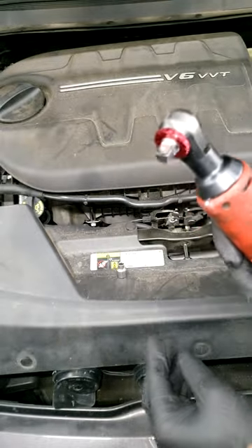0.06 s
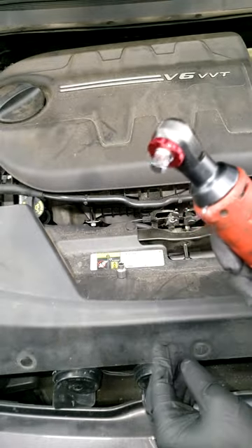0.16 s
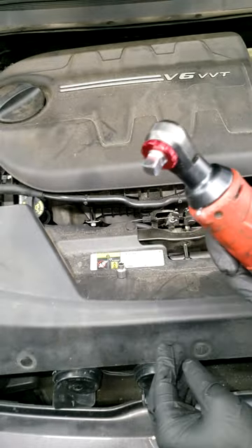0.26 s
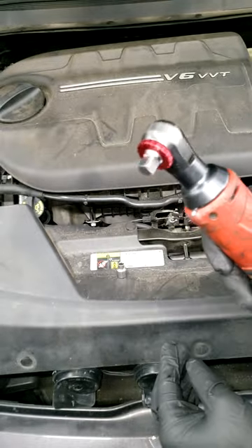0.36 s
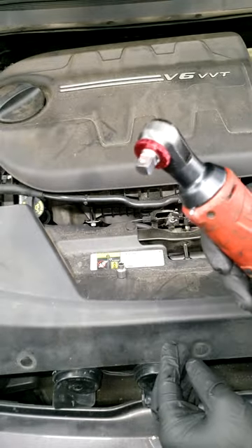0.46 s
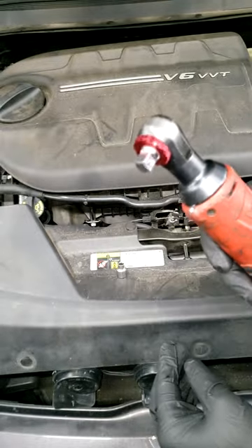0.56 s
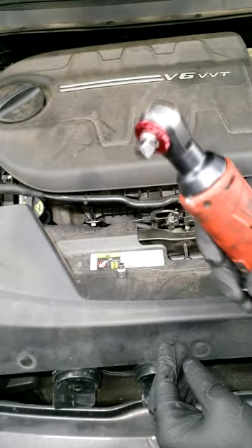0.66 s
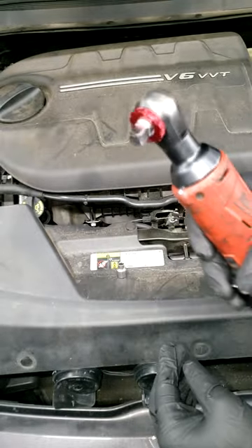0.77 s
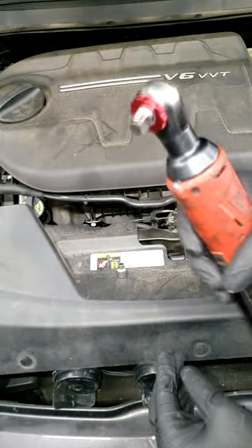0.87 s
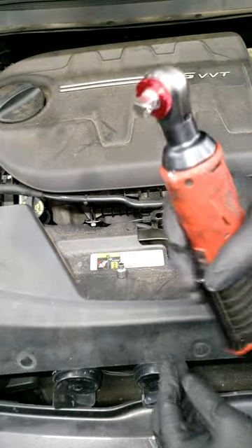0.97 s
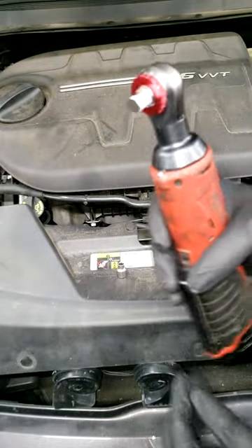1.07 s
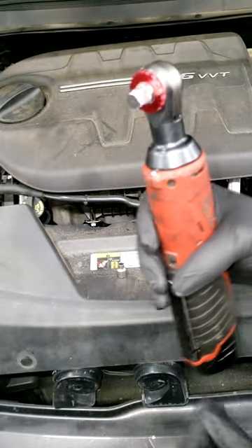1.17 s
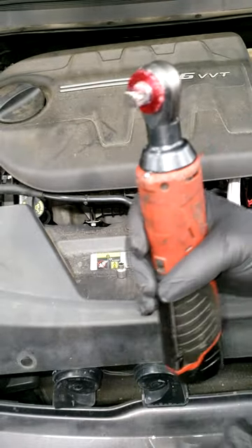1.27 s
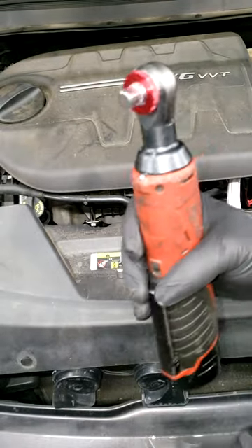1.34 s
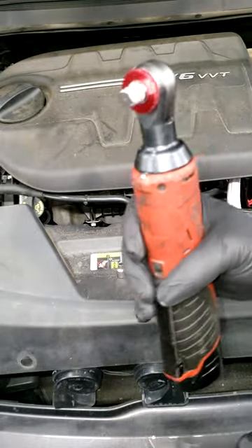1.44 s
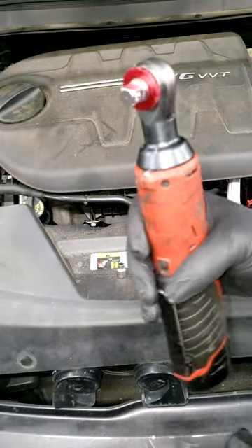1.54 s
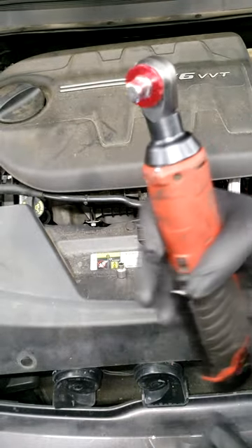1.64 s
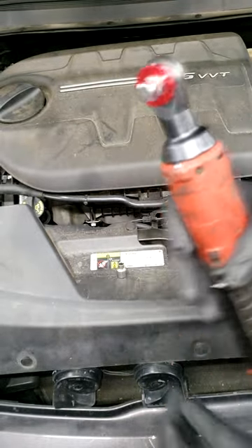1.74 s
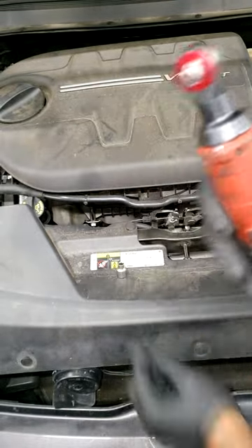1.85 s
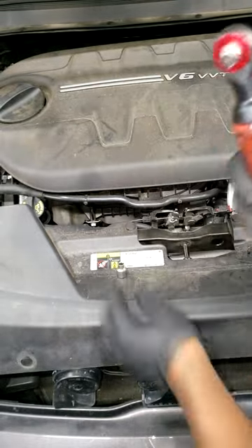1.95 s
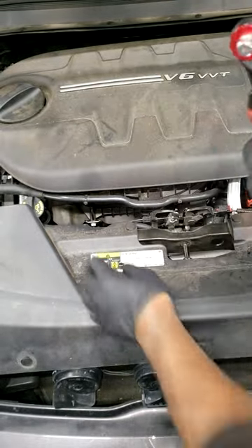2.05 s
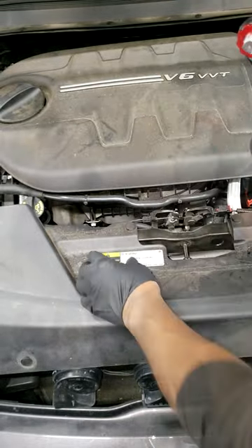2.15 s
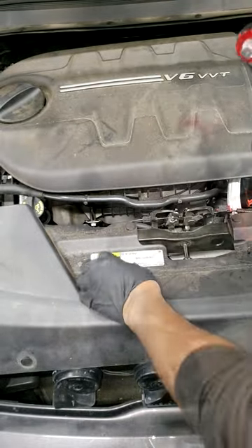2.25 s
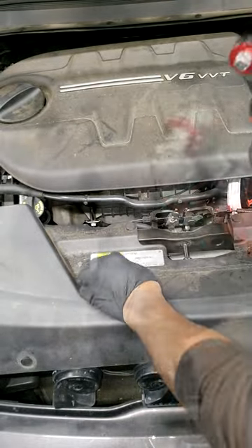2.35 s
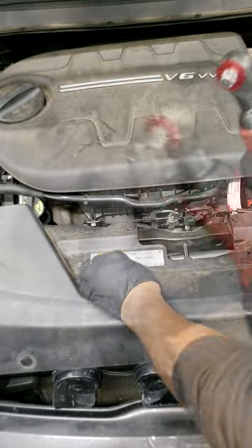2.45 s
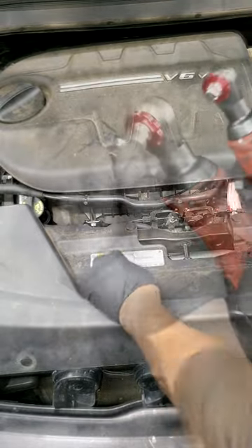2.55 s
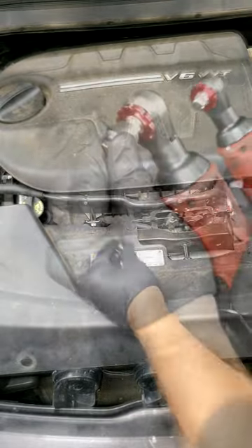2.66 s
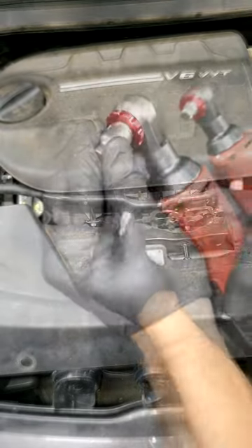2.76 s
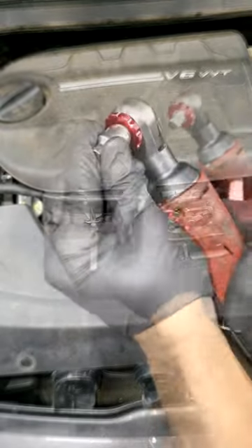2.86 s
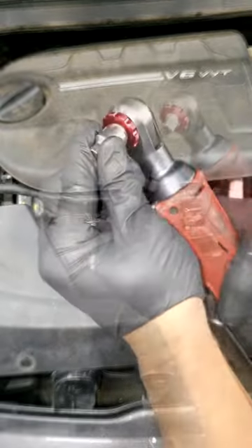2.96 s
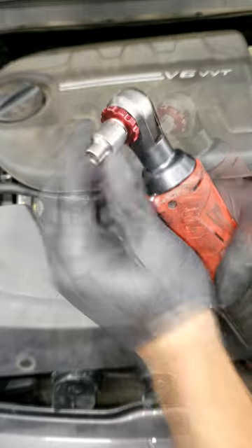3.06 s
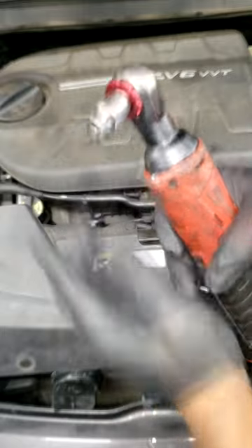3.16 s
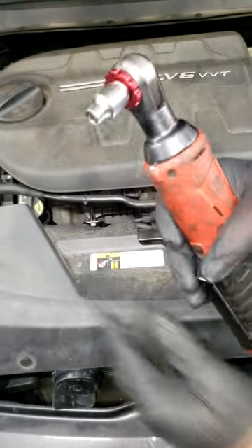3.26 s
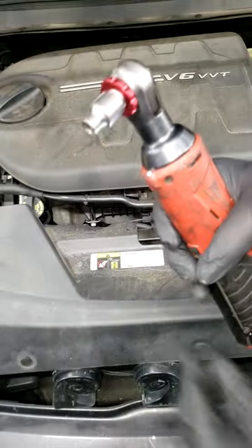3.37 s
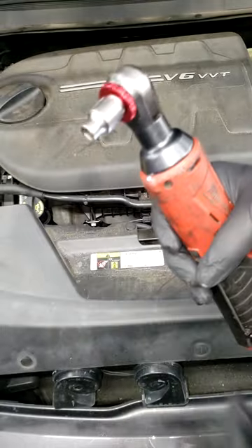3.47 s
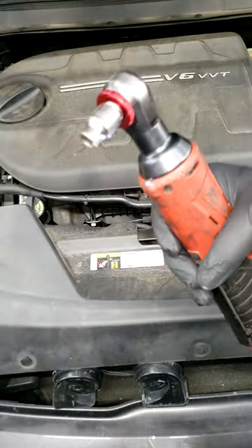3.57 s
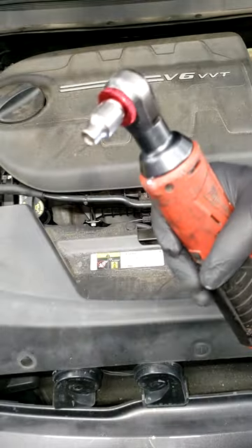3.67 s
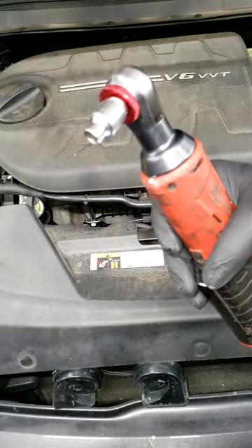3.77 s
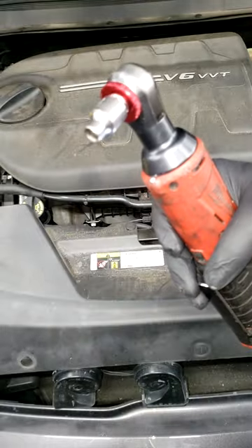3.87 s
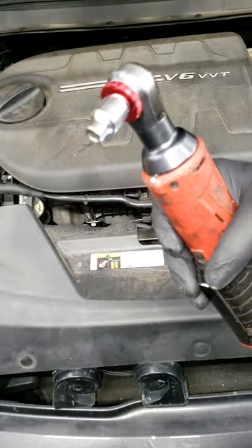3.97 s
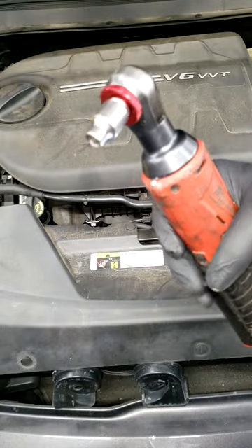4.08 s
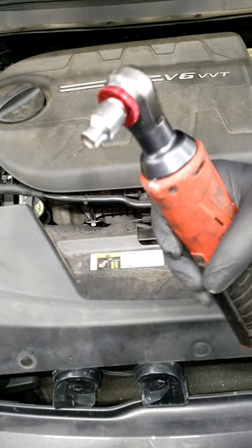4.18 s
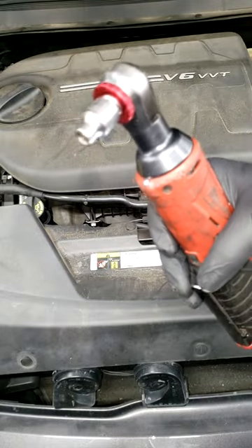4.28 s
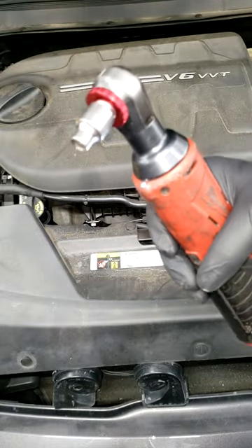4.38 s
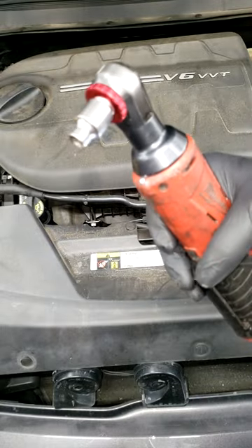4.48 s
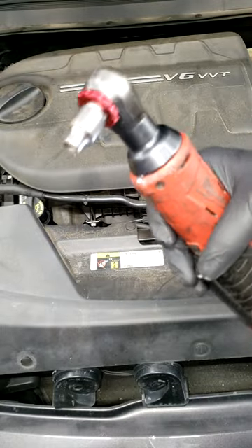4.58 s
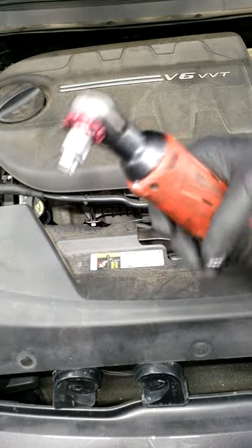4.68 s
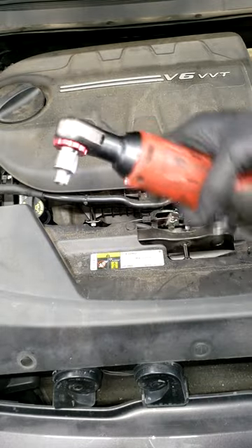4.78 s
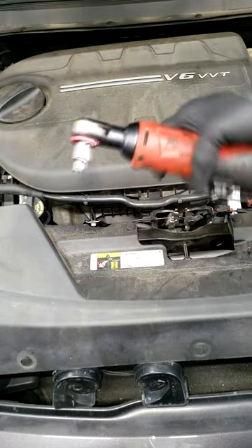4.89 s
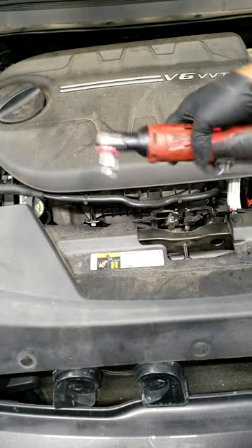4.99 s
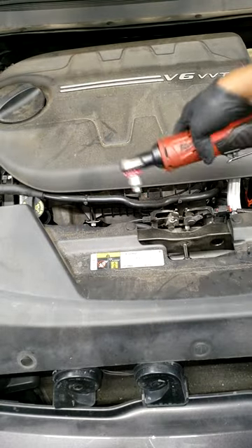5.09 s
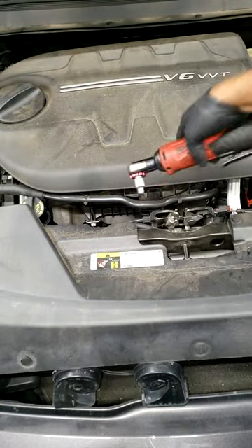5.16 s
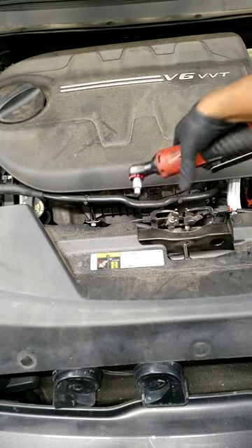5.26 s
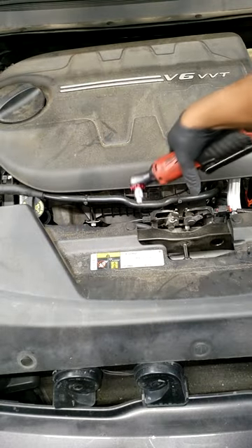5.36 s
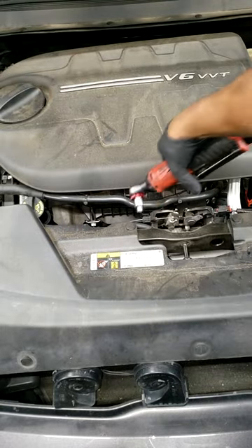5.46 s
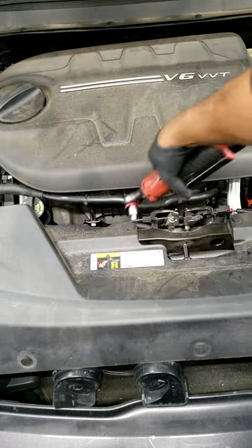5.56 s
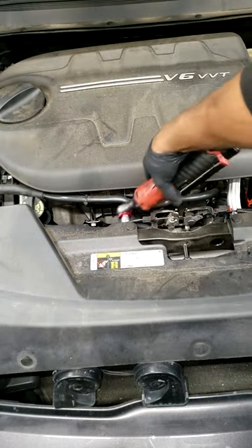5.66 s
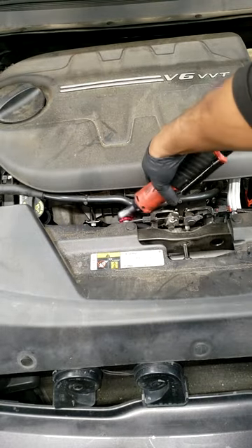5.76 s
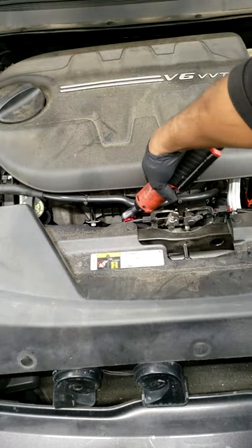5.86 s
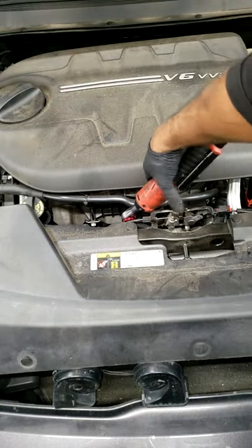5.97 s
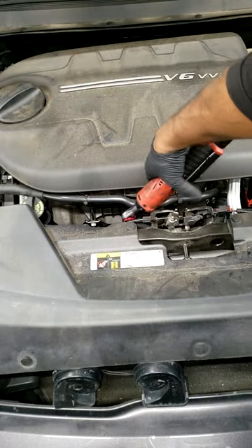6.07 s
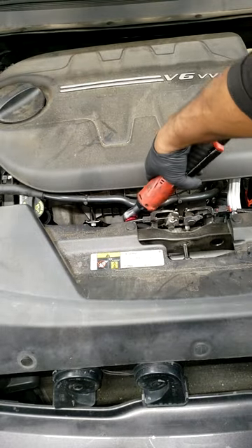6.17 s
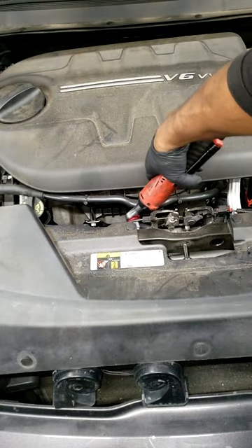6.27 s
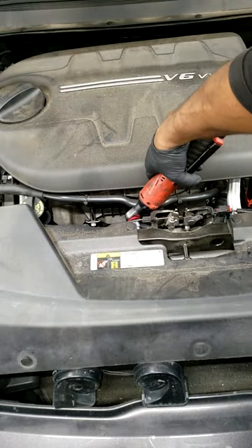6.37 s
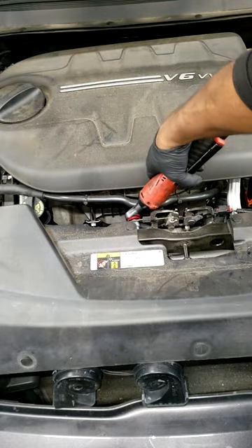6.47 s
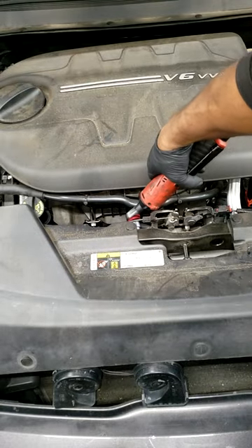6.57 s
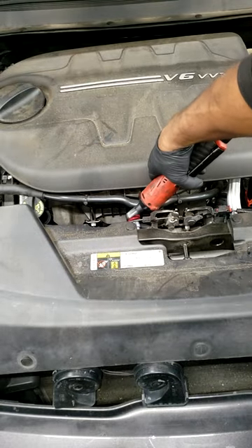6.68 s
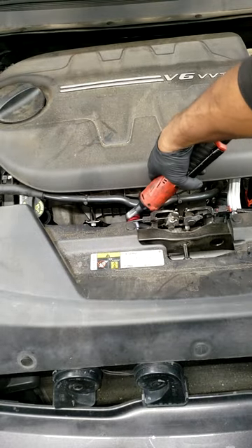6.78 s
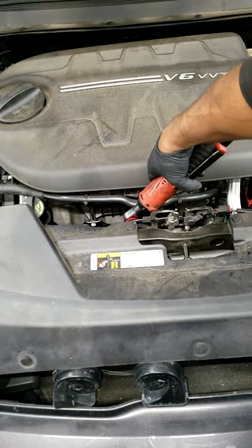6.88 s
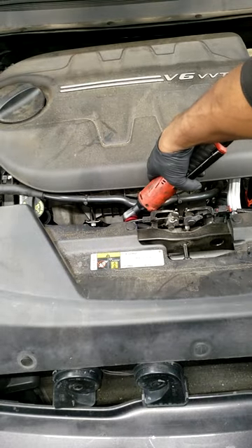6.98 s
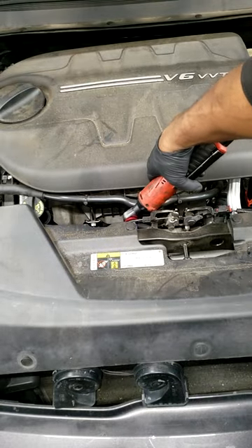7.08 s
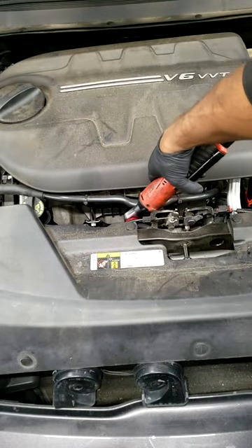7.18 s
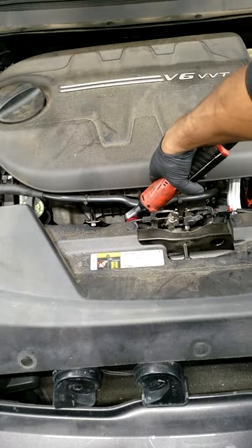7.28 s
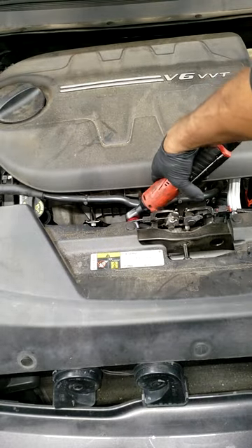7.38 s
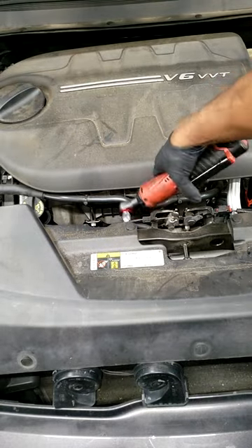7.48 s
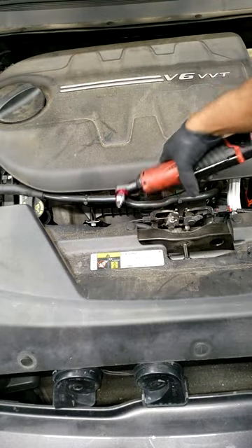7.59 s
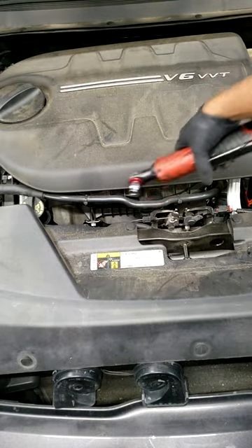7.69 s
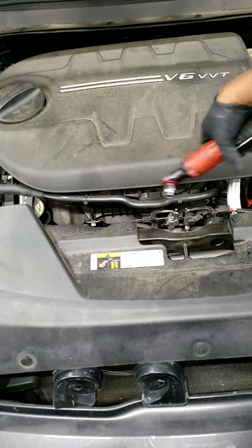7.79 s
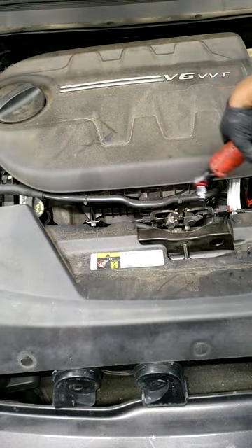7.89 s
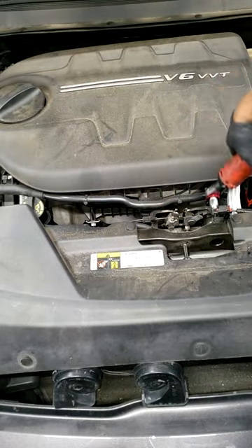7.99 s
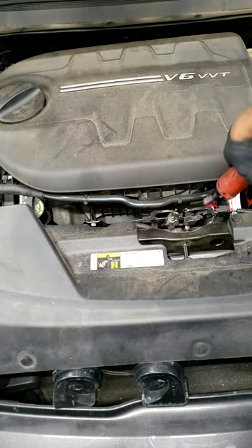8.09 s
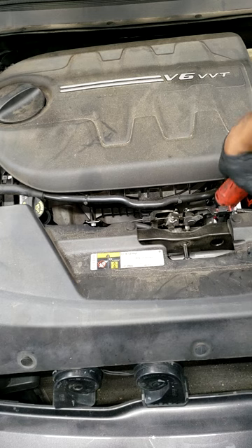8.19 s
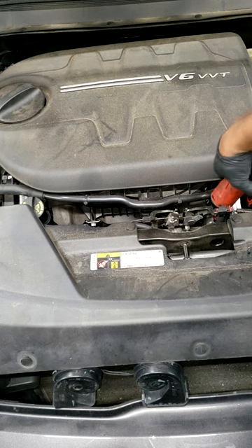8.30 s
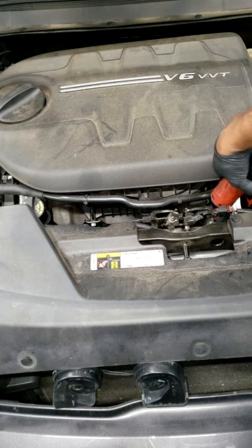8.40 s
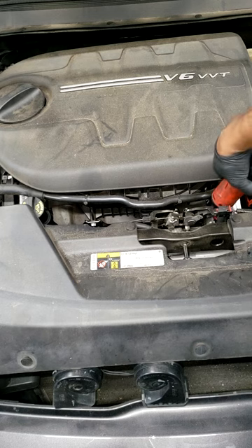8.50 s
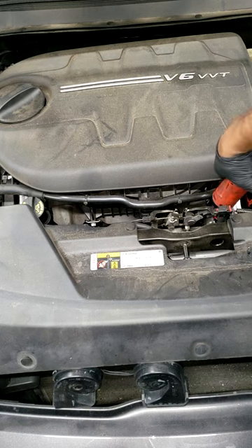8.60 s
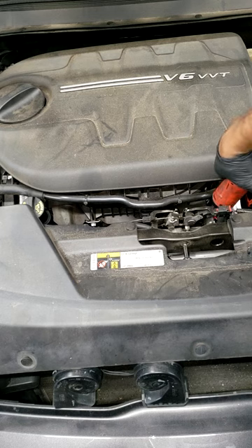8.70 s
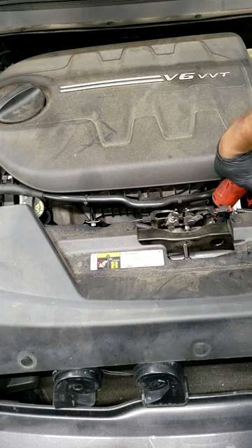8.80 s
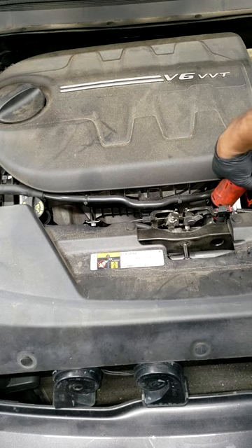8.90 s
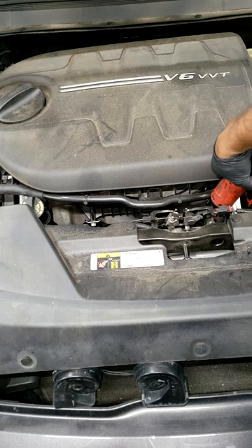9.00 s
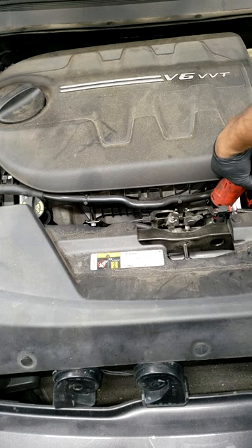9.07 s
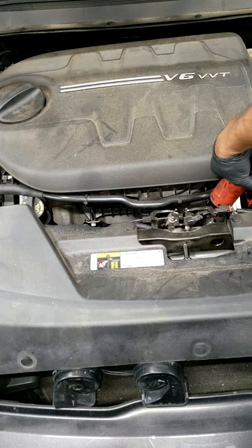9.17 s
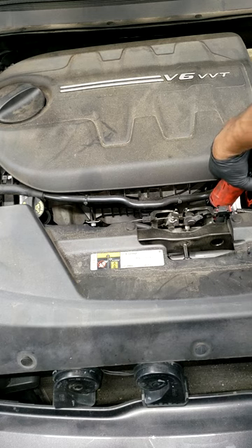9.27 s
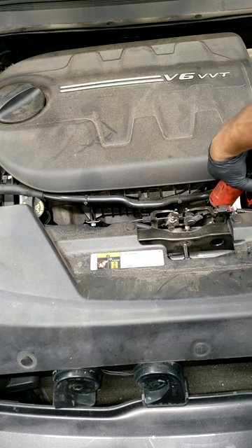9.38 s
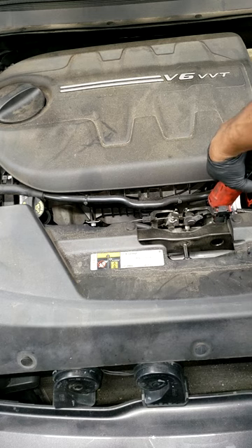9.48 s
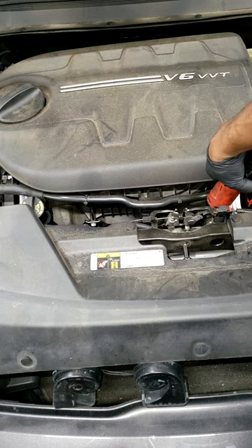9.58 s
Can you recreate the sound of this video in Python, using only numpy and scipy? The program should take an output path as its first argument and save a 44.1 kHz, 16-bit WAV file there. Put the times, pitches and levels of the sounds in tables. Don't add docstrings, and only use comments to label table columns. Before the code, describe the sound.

Close steel ratchet chatter in short bursts, slowing to separate clicks, metal knocks between, then two heavier loaded runs drumming into a car body.

```python
import sys
import numpy as np
from scipy import signal
from scipy.fft import rfft, irfft, next_fast_len
from scipy.io import wavfile
from scipy.ndimage import uniform_filter1d

SR = 44100
rng = np.random.default_rng(int(sys.argv[2]) if len(sys.argv) > 2 else 0)


def volts_from_db(level):
    exponent = np.asarray(level, float) / 20
    return 10 ** exponent


def bounce(signal):
    frames = np.transpose(np.atleast_2d(signal))
    limited = np.clip(frames, -1, 1)
    pcm = np.round(limited * 32767).astype(np.int16)
    wavfile.write(sys.argv[1], SR, pcm)


N = 425124
T = np.arange(N) / SR
PAD = next_fast_len(N + SR)
HZ = np.maximum(np.fft.rfftfreq(PAD, 1 / SR), 1)
FULL_HZ = 87.6


def rms_one(x):
    return x / np.sqrt(np.mean(x ** 2) + 1e-20)


def curve(rows):
    return np.interp(T, *np.transpose(rows))


def at_hz(points, hz):
    f, level = np.transpose(points)
    return np.interp(np.log(hz), np.log(f), level)


def drift(rate):
    knots = np.arange(0, N / SR + 1, 1 / rate)
    return np.interp(T, knots, rng.standard_normal(len(knots)))


def dying(clicks, t60):
    return signal.lfilter([1], [1, -volts_from_db(-60 / (t60 * SR))], clicks + 1e-18)


# f/Hz, left-right likeness
LIKENESS = [(60, 0.97), (300, 1), (700, 0.93), (1500, 0.45), (3000, 0.083), (15000, 0.29)]


def shaken(envelope, spectrum):
    cepstrum = irfft(np.log(volts_from_db(at_hz(spectrum, HZ))), PAD)
    cepstrum[1:PAD // 2] *= 2
    cepstrum[PAD // 2 + 1:] = 0
    body = np.exp(rfft(cepstrum))
    body /= np.sqrt(np.mean(np.abs(body) ** 2))
    mid, side = rfft(envelope * rng.choice([-1., 1.], (2, N)), PAD)
    alike = np.clip(at_hz(LIKENESS, HZ), 0, 1)
    ports = np.sqrt(1 + alike) * mid + np.sqrt(1 - alike) * side * [[1], [-1]]
    return irfft(ports / np.sqrt(2) * body, PAD)[:, :N]


# t/s, level/dB
RUMBLE_LEVEL = [(0, -51), (1.7, -62.5), (2.3, -54), (3.2, -53.5), (4.2, -65), (5.5, -64), (6.1, -61),
                (9.64, -58.5)]
# f/Hz, level/dB per Hz
RUMBLE = [(15, -30.5), (22, -18.5), (55, 0), (120, -6), (230, -18), (300, -23), (420, -33), (700, -47),
          (1200, -72)]
# f/Hz, level/dB per Hz
HISS = [(600, -45.5), (950, -22), (1300, -10.5), (1700, -11.5), (2300, -19.5), (5300, -24), (6900, -13.5),
        (8200, -30.5), (13000, -26), (16500, -37.5)]
# start t/s, end t/s, return time/s, level/dB
LULL = (4.2, 5.2, 0.1, -8)


def workshop():
    start, end, back, db = LULL
    rumble_db = curve(RUMBLE_LEVEL) + 2.0 * drift(8.7)
    hiss_db = -71 + db * (T > start) * np.clip(1 - (T - end) / back, 0, 1) + 1.5 * drift(5.5)
    return shaken(volts_from_db(rumble_db), RUMBLE) + shaken(volts_from_db(hiss_db), HISS)


def bay(x):
    room_t60_s, room_db, wall_cut_hz = .3, -12, 5000
    since = T[:SR // 2]
    tail = rng.standard_normal((2, len(since))) * volts_from_db(-60 * since / room_t60_s) * (since > .003)
    tail = signal.sosfilt(signal.butter(1, wall_cut_hz, fs=SR, output="sos"), tail)
    tail /= np.sqrt(np.sum(tail ** 2, axis=1, keepdims=True))
    return volts_from_db(room_db) * signal.fftconvolve(x, tail, axes=1)[:, :N]


# t/s, crack level/dB, heft (clunk over crack)/dB, ring-out/s
KNOCKS = [(2.7736, -14, -21, 0.041), (2.7943, -30, -21, 0.13), (3.027, -52, -10, 0.068),
          (3.0901, -53, -15.5, 0.056), (3.2038, -39.5, -22.5, 0.037), (3.36, -39.5, -9.5, 0.05),
          (3.3835, -50.5, -15, 0.057), (2.41, -73, 8.5, .05), (2.478, -77.5, 9, 0.033),
          (5.008, -53.5, -6, .04), (5.103, -65, -5, .03), (5.1994, -60.5, -22, 0.05),
          (5.5888, -74.5, 11.5, 0.037), (5.7037, -24.5, -4, 0.056), (5.7123, -32, -2.5, 0.03),
          (5.7437, -40, 0.5, 0.075), (5.7864, -47.5, 2.5, 0.05), (5.809, -45.5, 5.5, 0.074),
          (5.8524, -52.5, 6.5, 0.052), (6.1444, -49, -10.5, 0.045), (6.1564, -55, -17, 0.055),
          (8.223, -20.5, -9, 0.085), (8.2624, -25, -4.5, 0.05), (8.2894, -39.5, 2, 0.06),
          (8.7228, -51.5, -14, 0.05)]
# f/Hz, level/dB per Hz
CRACK = [(2060, -37), (3500, -12.5), (4750, -9.5), (7050, -5), (8910, -17.5), (12600, -6.5), (15500, -11.5),
         (16500, -24.5)]
# f/Hz, level/dB per Hz
CLUNK = [(410, -31), (700, -10), (1700, 0.5), (1830, 0.5), (2420, -5), (4000, -15.5), (5200, -29.5),
         (8800, -120)]
# f/Hz, level/dB per Hz
THUD = [(29, -38.5), (50, -10.5), (75, 0), (189, 1), (227, -4), (463, -3.5), (900, -16), (1170, -37.5),
        (1980, -120)]
# t/s, f/Hz, level/dB, t60/s
STRUCK_PANELS = [
    (5.819, 519.4, -58.5, 1.2),
    (8.3, 259, -52.5, 0.88),
]


def handling():
    thud_per_heft, thud_db = 1.63, -5
    crack, clunk, thud, rings = np.zeros((4, N))
    since = T[:SR // 2]
    for s, crack_db, heft_db, t60 in KNOCKS:
        span = slice(int(s * SR), int(s * SR) + len(since))
        snap = 1 + 1.1 * volts_from_db(-60 * since / 0.0042)
        crack[span] += volts_from_db(crack_db - 7 - 60 * since / max(t60, .005)) * snap
        clunk_db = crack_db + heft_db - 0.5 - 60 * since / max(1.8 * t60, .01)
        clunk[span] += volts_from_db(clunk_db) * np.minimum(since / 0.0014, 1)
        low_db = crack_db + thud_per_heft * heft_db + thud_db - 60 * since / (0.064 + 2.4 * t60)
        thud[span] += volts_from_db(low_db) * np.minimum(since / .004, 1)
    for s, hz, db, t60 in STRUCK_PANELS:
        decay = volts_from_db(db - 60 * np.maximum(T - s, 0) / t60)
        rings += (T >= s) * decay * np.sin(2 * np.pi * hz * T)
    return shaken(crack, CRACK) + shaken(clunk, CLUNK) + shaken(thud, THUD) + rings


# t/s, length/s, level/dB
BEEPS = [
    (3.437, .024, -52),
    (6.226, .03, -61),
    (7.913, 0.023, -53.5),
    (8.834, 0.026, -66),
]


def switching_beeps():
    out = np.zeros(N)
    comb = sum(np.sin(2 * np.pi * k * 1820 * T + k) for k in range(1, 5))
    for s, length, db in BEEPS:
        out += volts_from_db(db) * comb * np.clip((T - s) / length, 0, 1) * (T < s + length)
    return out


# t/s, share 0-1
ON_BOLT = [(0, 0.08), (6.2, 0.02), (6.21, 1), (7.4, 0.93), (7.46, 0.32), (8.8, 0), (8.811, 0.91), (9.64, 1)]


def on_bolt():
    return np.clip(curve(ON_BOLT), 0, 1)


# f/Hz, level/dB over the hum
SINGING_PANELS = [(1250, -15), (1430, -10.5), (1850, -16.5), (2050, -11), (2600, -15)]


def panels(hum_db):
    out, radius = np.zeros(N), np.exp(-np.pi * 70 / SR)
    for hz, db in SINGING_PANELS:
        poles = [1, -2 * radius * np.cos(2 * np.pi * hz / SR), radius * radius]
        band = signal.lfilter([1, 0, -1], poles, rng.standard_normal(N))
        out += volts_from_db(hum_db + db + 6.3 * drift(6)) * rms_one(band)
    return out * on_bolt()


ORDERS_ON_BOLT = [1, 2, 3, 4, 5, 6, 7, 8, 6.57, 14, 16.2, 18.8, 21, 23.25, 66]
# first bolt level/dB, second bolt level/dB
DRUM = [(-54, -52.5), (-50, -60), (-57.5, -47), (-56, -40), (-61, -41.5), (-48.5, -53.5), (-48.5, -44),
        (-54.5, -53.5), (-47.5, -57.5), (-50, -62.5), (-44.5, -49), (-55.5, -47.5), (-53, -38),
        (-43.5, -51.5), (-51, -44.5)]


def car_body_orders(crank_hz, hum_db):
    out = np.zeros(N)
    load = on_bolt() * volts_from_db(np.minimum(hum_db + 29.5, 0)) * np.clip(crank_hz / 70, 0, 1)
    for order, (first_db, second_db) in zip(ORDERS_ON_BOLT, DRUM):
        level = volts_from_db(np.where(T < 8, first_db, second_db) + 6.0 + 3.5 * drift(11))
        wander = .3 * order ** .7 * drift(22)
        out += load * level * np.sin(2 * np.pi * order * FULL_HZ * T + wander)
    return out


# f/Hz, level/dB
HOUSING = [(250, -38), (400, 0.5), (520, 7.5), (790, 2), (930, -11), (1400, -16.5), (3000, -31)]


def motor_whine(turns, crank_hz, whine_db):
    whine_order = 13.55
    out = np.zeros(N)
    for k, db in enumerate([-3.0, -11, -16, -15.5], start=1):
        shell_db = at_hz(HOUSING, k * whine_order * crank_hz)
        level = volts_from_db(whine_db + 3.0 + db + shell_db + 1.4 * drift(25))
        out += level * np.sin(2 * np.pi * k * whine_order * turns + 0.72 * drift(50))
    return out


# f/Hz, level/dB per Hz
RASP = [(1180, -27), (2000, -1), (2200, -3), (2650, -10.5), (3010, -9.5), (6050, -3), (6910, 0.5),
        (8240, -9), (9000, -15), (11700, -31.5), (19800, -120)]
# f/Hz, level/dB per Hz
HUM_FREE = [(120, -46.5), (200, -17), (318, -16.5), (365, -10.5), (1170, -6), (1360, 1.5), (1600, -5),
            (1960, -1.5), (2450, -4.5), (4000, -6), (5200, -28), (8800, -120)]
# f/Hz, level/dB per Hz
HUM_BOLT = [(35, -42), (60, -12), (85, -6.5), (128, -13), (224, -11), (258, -6.5), (292, -9.5), (348, -6.5),
            (400, -5.5), (437, -3.5), (666, -6), (1420, -2.5), (4000, -10), (5200, -42.5), (8800, -120)]


def gears(turns, crank_hz, rasp_db, hum_db):
    bolt = on_bolt()
    teeth = rng.random(N) < 12.0 * crank_hz / SR
    teeth = teeth * volts_from_db(2.4 * np.minimum(rng.exponential(1, N), 4))
    chatter = dying(teeth, 0.0081) / np.sqrt(crank_hz)
    grain = rms_one(chatter) + .5 * np.clip(crank_hz / 55, .2, 1) + 1.4 * bolt
    grain = grain / (1.194 + 0.42 * bolt)
    grain = grain * volts_from_db(0.67 * np.cos(2 * np.pi * turns) + 2.0 * drift(30))
    rasp = shaken(volts_from_db(rasp_db - 2.2) * grain, RASP)
    swell = volts_from_db(hum_db - 0.5 + 0.73 * drift(25)) * (0.43 * grain + 0.54)
    slow = np.clip(1.6 - crank_hz / 30, 0, 1)
    shell = shaken(volts_from_db(hum_db - 3.5) * slow, [(450, -22.5), (740, -6.5), (950, -30.5)])
    hum = shaken(swell * (1 - bolt), HUM_FREE) + shaken(volts_from_db(-2.0) * swell * bolt, HUM_BOLT)
    return rasp + shell + hum


# t/s, peak level/dB
JOLTS = [(0.0189, -20.5), (0.3537, -19.5), (0.6419, -12), (0.846, -8.5), (0.936, -6), (0.9526, -3),
         (1.1765, -7.5), (1.2598, -9), (1.281, -10), (1.6335, -7.5), (1.8157, -11), (3.479, -16.5),
         (3.4914, -11), (3.5022, -12.5), (3.51, -2.5), (4.159, -21), (6.2929, -18), (6.5049, -3),
         (7.5914, -18)]
# share of turn, level/dB, chance 0-1, loss when slow/dB
STROKE = [(0.0, -0.5, 0.81, 24.5), (.13, -9, 0.65, 18.5), (.3, -2, .8, 4.5), (0.549, 1.5, 1, -3.5),
          (.705, -8, 1, -12.5), (.87, -17.5, 0.58, 3.5)]


def pawl_clicks(turns, crank_hz, clack_db, slow):
    last_gasp_db = 6.5
    clicks = np.zeros(N)
    whole = np.arange(int(turns[-1]))
    bolt = on_bolt()
    jolt_s, jolt_db = np.transpose(JOLTS)
    for share, db, chance, slow_db in STROKE:
        luck = rng.random((len(whole), 3))
        at = np.searchsorted(turns, whole + share)
        jitter = 0.089 * (luck[:, 0] - .5) * (1 - slow[at])
        at = np.minimum(np.searchsorted(turns, whole + share + jitter), N - 1)
        clear_of_jolts = np.min(np.abs(T[at, None] - jolt_s), axis=1) > .008
        size_db = clack_db[at] + db - slow_db * slow[at] + last_gasp_db * slow[at] ** 4 + 6
        size_db -= 1.84 * np.log(luck[:, 1] + 0.033) * (1 - 1.6 * slow[at])
        size_db -= 10 * np.log10(crank_hz[at] / 60) + 3.8 * bolt[at]
        clicks[at] += volts_from_db(size_db) * (luck[:, 2] < chance) * clear_of_jolts
    clicks[np.round(jolt_s * SR).astype(int)] += volts_from_db(jolt_db + 1.5)
    return clicks


# f/Hz, level/dB per Hz
CLACK = [(1470, -46), (2500, -21), (4660, -19), (5170, -15.5), (6870, -10.5), (8240, -18), (9130, -18),
         (11300, -7.5), (12800, 4.5), (14000, -6), (15900, -6), (16500, -31.5)]
# f/Hz, level/dB per Hz
RATTLE = [(4710, -43), (8000, -25.5), (8980, -16.5), (12900, 0.5), (14100, -5.5), (15900, -8), (16300, -23),
          (16500, -47)]


def clacks(turns, crank_hz, clack_db):
    swing_hz = 47.6
    slow_ring_db, slow_ring_s = -15, .03
    slow = np.clip(1 - crank_hz / swing_hz, 0, 1)
    clicks = pawl_clicks(turns, crank_hz, clack_db, slow)
    contact = signal.lfilter([.2], [1, -.8], dying(clicks, .008))
    contact += volts_from_db(slow_ring_db) * dying(clicks * slow, slow_ring_s)
    for s, db in JOLTS:
        contact[int(s * SR):int((s + .0045) * SR)] += volts_from_db(db - 17.5)
    rattle_db = clack_db - 14.0 + 11.7 * on_bolt() + 2.3 * drift(150) + 2.2 * np.cos(4 * np.pi * turns)
    rattle = volts_from_db(rattle_db) * np.clip(crank_hz / 45, 0, 1) ** 2
    return shaken(contact + volts_from_db(-22) * dying(clicks, .045), CLACK) + shaken(rattle, RATTLE)


STICK_HZ = 3.95
# press t/s, spin-up/Hz per s, nearness level/dB
PULLS = [
    (0.0, 904, 5),
    (.345, 500, 3),
    (.625, 499, 2),
    (.915, 548, 1.5),
    (1.265, 421.5, -0.48),
    (3.447, 843, -2.5),
    (4.185, 330, -4.0),
    (4.455, 150, -3),
    (6.238, 800, -4.5),
    (8.852, 659, -4.5),
]
RESTS_S = [.81, 1.168, 1.487, 1.865, 2.387, 4.73, 4.975, 5.046, 8.165, 12]
# run start t/s, drop t/s
LAST_DROPS = [
    (0, 2.3012),
    (3.4, 4.9554),
    (6.2, 8.051),
]


def crank():
    friction_hz_per_s, windage_hz_per_s3 = 68, 14
    main_drop = .55
    hz, near_db = np.zeros(N), np.zeros(N)
    for (press, spin_up, db), rest in zip(PULLS, RESTS_S):
        i = int(press * SR)
        left = np.maximum(rest - T[i:], 0)
        coast = friction_hz_per_s * left + windage_hz_per_s3 * left ** 3
        driven = np.minimum(hz[i] + spin_up * (T[i:] - T[i]), FULL_HZ)
        hz[i:] = np.minimum(driven, coast * (coast > STICK_HZ))
        near_db[i:] = db
    turns = np.cumsum(hz) / SR
    for start, drop in LAST_DROPS:
        turns[int(start * SR):] += (main_drop - turns[int(drop * SR)]) % 1
    return np.maximum(hz, .3), turns, uniform_filter1d(near_db, size=2000)


# full-speed level/dB, slope/dB per tenfold speed, more on a bolt/dB,
# more while spinning up/dB, share of nearness
LAYERS = [
    (-12.5, 36, -3.5, 5.5, 1.04),
    (-27, 39.5, 0.5, 8, 1.14),
    (-35, 25, 8.5, 5, 1.105),
    (-56, 3, 12.5, -1.5, 1.4),
]


def scene():
    crank_hz, turns, near_db = crank()
    bolt = on_bolt()
    rising = (np.gradient(crank_hz) > 0) * 1.
    pushing = uniform_filter1d(rising, size=900) * (1 - crank_hz / FULL_HZ)
    resting_db = -80 * np.clip(1 - crank_hz / STICK_HZ, 0, 1)
    speed = np.log10(crank_hz / FULL_HZ)
    clack_db, rasp_db, hum_db, whine_db = [
        db + slope_db * speed + load_db * bolt + push_db * pushing + share * near_db + resting_db
        for db, slope_db, load_db, push_db, share in LAYERS]
    near = handling() + switching_beeps() + panels(hum_db) + car_body_orders(crank_hz, hum_db)
    near = near + motor_whine(turns, crank_hz, whine_db)
    near = near + gears(turns, crank_hz, rasp_db, hum_db) + clacks(turns, crank_hz, clack_db)
    return near + bay(near) + workshop()


def top_cut(x):
    return signal.sosfilt(signal.butter(12, 16830, fs=SR, output="sos"), x)


# f/Hz, level/dB
PORTS = [(60, 4.5), (150, 4), (380, 3.5), (950, 5.5), (2380, 3.5), (5980, 12.5), (15000, 7)]
# f/Hz, left lead/rad
LEAD = [(0, -0.5), (1460, -0.52), (2670, 6), (5770, 11.5), (11600, 4), (16400, 11.5)]


def record(dry):
    shade = volts_from_db(at_hz(PORTS, HZ) * np.array([[.3], [-.7]]))
    lag = np.exp(-1j * np.interp(HZ, *np.transpose(LEAD)) * np.array([[0], [1]]))
    x = irfft(rfft(dry, PAD) * shade * lag, PAD)[:, :N]
    x = .9 * np.tanh(x / .9)
    mix = signal.sosfilt(signal.cheby2(12, 45, 16350, fs=SR, output="sos"), x)
    return top_cut(mix)


dry = scene()
out = record(dry)
bounce(out)
```